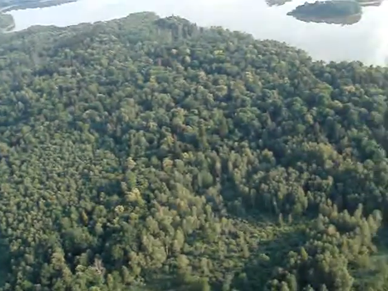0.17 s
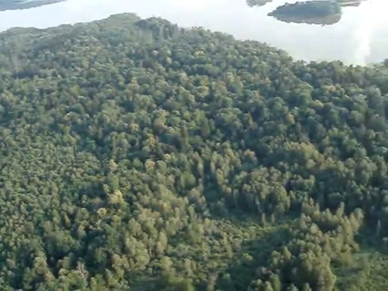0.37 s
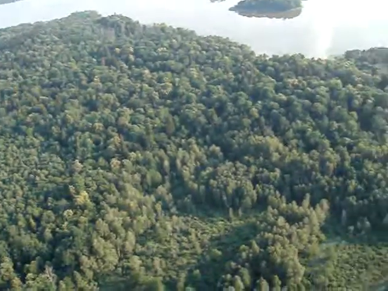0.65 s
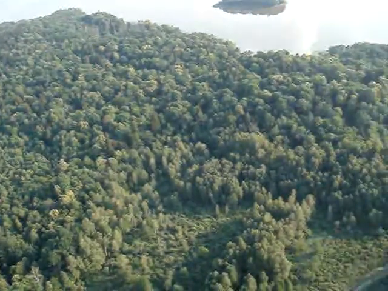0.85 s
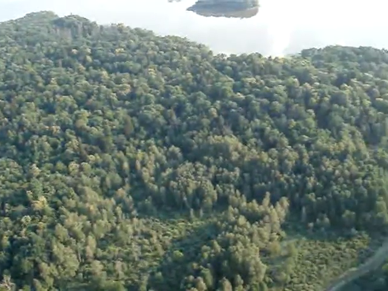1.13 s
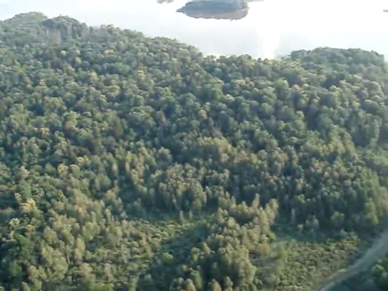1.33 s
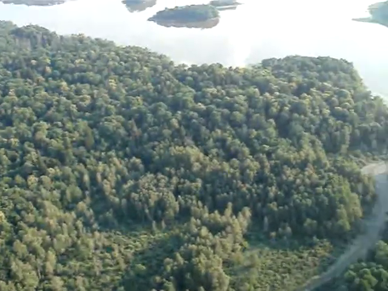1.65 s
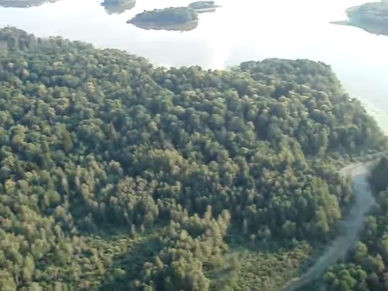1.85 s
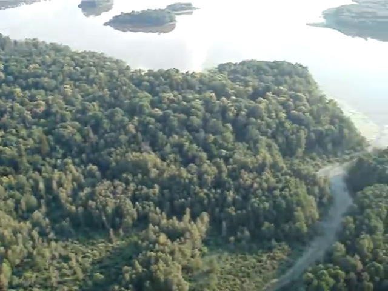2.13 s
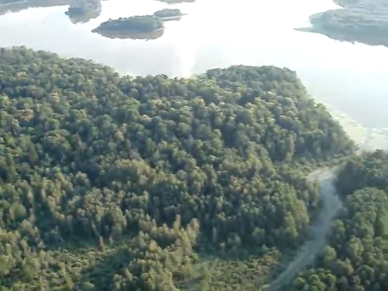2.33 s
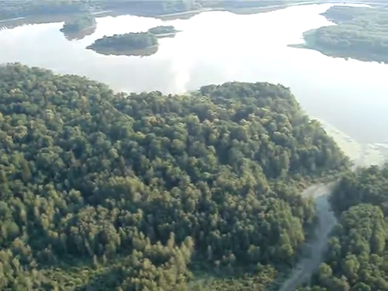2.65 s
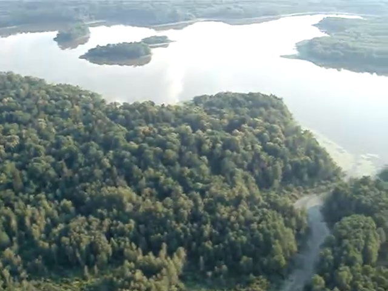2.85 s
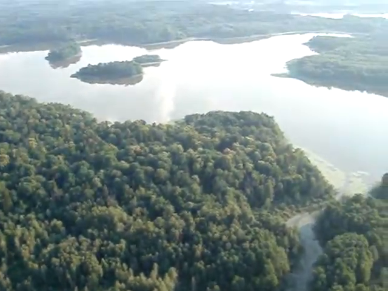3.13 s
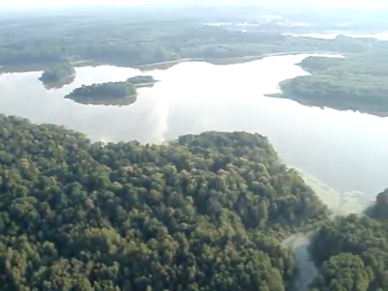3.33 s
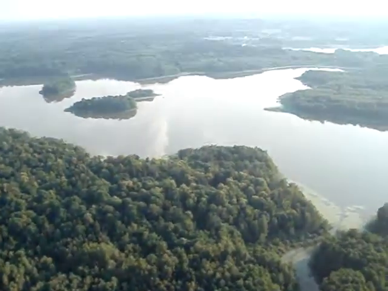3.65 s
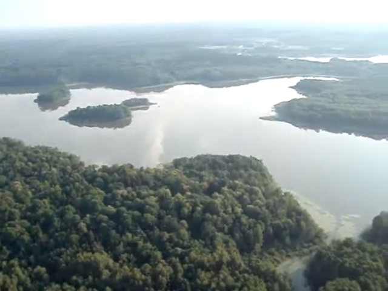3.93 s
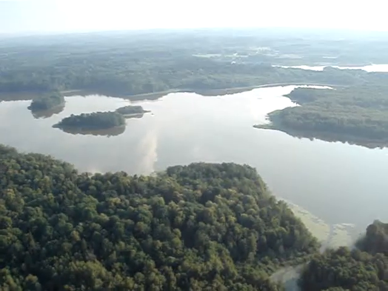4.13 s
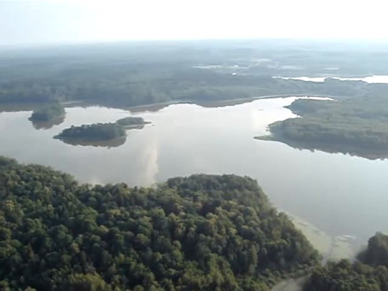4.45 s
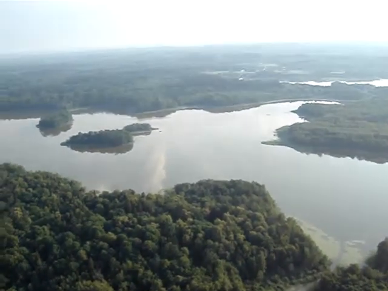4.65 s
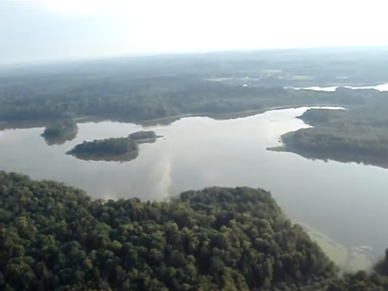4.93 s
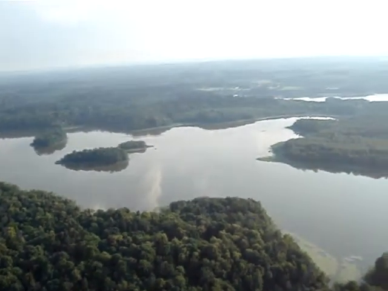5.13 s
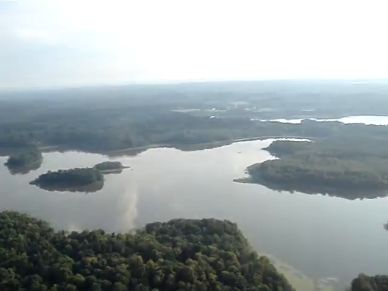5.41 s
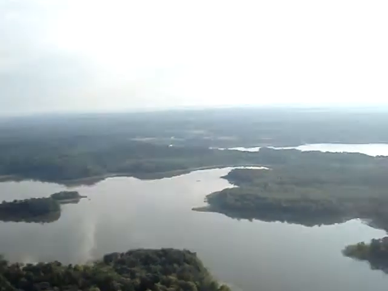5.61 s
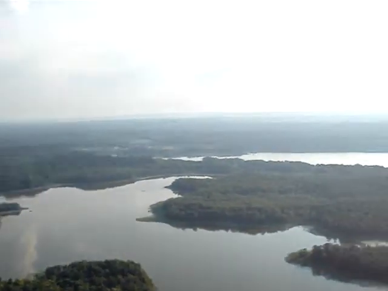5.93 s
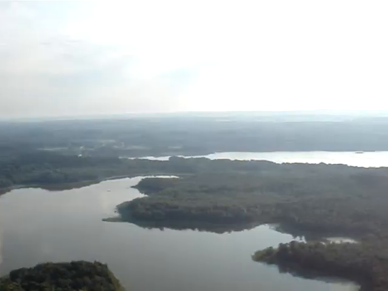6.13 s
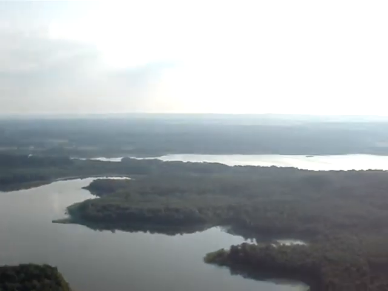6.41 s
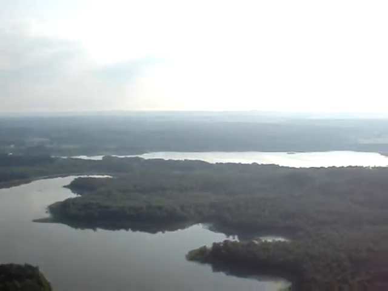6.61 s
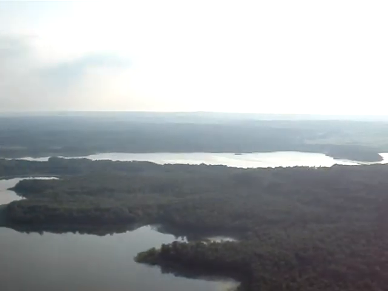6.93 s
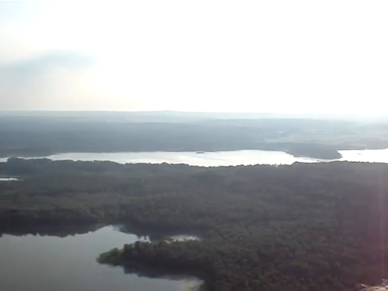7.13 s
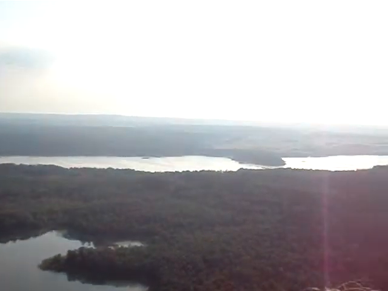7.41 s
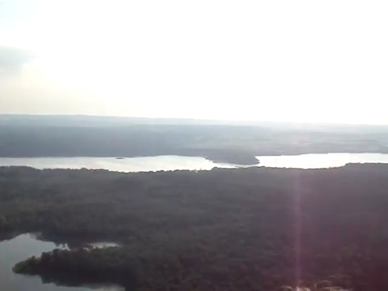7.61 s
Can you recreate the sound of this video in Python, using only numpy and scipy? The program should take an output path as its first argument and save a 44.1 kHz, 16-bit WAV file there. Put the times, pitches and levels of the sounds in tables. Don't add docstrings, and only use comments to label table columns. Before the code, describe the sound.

A sputtering pilot flame spits and faintly whistles for a second, then a propane balloon burner ignites with a whoomp and roars on loudly.

```python
import sys
import numpy as np
from scipy import signal
from scipy.fft import rfft, irfft
from scipy.io import wavfile
from scipy.ndimage import uniform_filter1d, map_coordinates

SR = 44100
rng = np.random.default_rng(int(sys.argv[2]) if len(sys.argv) > 2 else 0)


def volts(x):
    e = np.asarray(x, float) / 20
    return 10 ** e


def materialize(psi):
    bounded = np.clip(np.atleast_2d(psi).T, -1, 1)
    quanta = np.round(bounded * 32767).astype(np.int16)
    wavfile.write(sys.argv[1], SR, quanta)


N = 342216

# time_s, turn (0-3, picks between the colours below)
CAMERA_TURN = [(0, 0.5), (1.8, 0.029), (2.6, 0.28), (3.5, 0.93), (4.2, 1.23), (4.9, 1.23), (5.3, 1.72),
               (5.9, 2.24), (6.4, 2.44), (6.8, 2.6), (7.76, 3.3)]
# freq_hz, density_db (per Hz)
FLAME_COLOURS = [
    [(110, -40), (180, -12), (267, -5), (322, -6.5), (375, -2), (426, -7), (537, 0.5), (760, -6),
     (855, -21.5), (950, -15.5), (1100, -12), (1500, -20.5), (2000, -14), (2580, -32), (3770, -51)],
    [(110, -39), (180, -13.5), (255, -6), (304, -10), (349, 1.5), (402, -9), (441, -3), (519, 1), (662, -8),
     (875, -14.5), (1090, -14), (1380, -20), (1820, -13), (2900, -29.5), (3770, -52.5), (6380, -120)],
    [(110, -35), (180, -13), (249, -6), (287, -12.5), (349, -1), (388, -11), (436, 0), (596, -10),
     (770, -6), (972, -16), (1100, -15), (1860, -11.5), (2120, -16.5), (2900, -30.5), (3770, -58),
     (6380, -120)],
    [(110, -37), (180, -11), (225, -9.5), (345, -5), (379, -6), (451, -1.5), (600, -7), (715, -1.5),
     (800, -8), (900, -12.5), (1680, -14.5), (1910, -10.5), (2120, -21), (2900, -36), (3770, -50)],
]
# freq_hz, density_db (per Hz)
JET_COLOURS = [
    [(1410, -30), (2400, -5), (2610, -14.5), (3360, -4), (4740, -6), (5120, -2.5), (6300, -0.5), (7700, -4),
     (8410, -11), (9870, -17), (12800, -48), (21700, -120)],
    [(1410, -32), (2400, -13), (3040, -13), (4140, -5), (4770, -8.5), (6150, -2.5), (7090, -5),
     (7700, -6.5), (8510, -15), (9870, -18.5), (12800, -50.5), (21700, -120)],
    [(1410, -31.5), (2400, -8), (2700, -13), (3380, -6), (4440, -4), (5800, -1.5), (6300, 0.5),
     (7650, -1.5), (8460, -12.5), (9870, -16.5), (12800, -56), (21700, -120)],
    [(1410, -31), (2400, 1), (3250, -2), (3880, -3.5), (4240, -1), (5630, -3.5), (6560, -0.5), (7560, -3),
     (8360, -9.5), (9870, -15.5), (12800, -54), (21700, -120)],
]
JET_SHADE_DB = [-0.5, 0.63, -0.06, -2.5]
# freq_hz, density_db (per Hz)
RUMBLE_COLOUR = [(13, -65), (22, -26), (92, -12.5), (146, 0), (189, -6.5), (260, -1), (340, -27),
                 (570, -120)]
# peak_s, rise_s, surge_db (over steady), surge_fade_s, steady_db
FLAME_CATCH = (.939, .027, 2.5, .013, -16.2)
JET_CATCH = (.972, .066, 7, .066, -23.2)
RUMBLE_CATCH = (.94, .03, 7, .025, -30)
# freq_hz, density_db (per Hz)
COIL_COLOUR = [(1700, -42), (1830, -5), (1900, 8), (1980, -8), (2120, -43)]
NOZZLE_COLOUR = [(5800, -39), (6050, -5), (6170, 8), (6290, -11), (6550, -43)]
# centre_s, half_length_s, peak_db
COIL_SWELLS = [
    (2.95, 0.37, -36),
    (3.7, 0.34, -34),
    (5.3, 0.29, -31.5),
    (6.8, 0.68, -32.5),
]
NOZZLE_SWELLS = [
    (2.6, 0.62, -43),
    (3.7, 0.3, -29.5),
    (5.5, .4, -41.5),
]
WHISTLE_SWELLS = [
    (.09, .04, -49),
    (.26, .06, -55),
    (.54, 0.065, -50.5),
    (.72, .04, -52),
    (.9, .05, -51),
]
# start_s, peak_db, low_share_db
SPITS = [(0.0136, -14, 1), (0.074, -19, -3.5), (0.188, -16, -3), (0.195, -13.5, -6), (0.329, -15.5, -4),
         (0.367, -19.5, -4), (0.4519, -32, -4), (0.4988, -12.5, -1), (0.5194, -20, 4), (0.5935, -32, 1.5),
         (0.6464, -21.5, 4), (0.667, -15.5, -7), (0.7148, -20.5, -6), (0.7637, -30, -4), (0.837, -13, 7.5),
         (2.4194, -14, 6)]
# freq_hz, density_db (per Hz)
SPIT_COLOUR = [(530, -59), (900, -27), (3000, -17), (3500, -12.5), (4340, -8.5), (4900, -18), (5500, -4.5),
               (7200, -8), (8000, -8), (8500, -19), (10000, -30), (12000, -60)]
PILOT_COLOUR = [(15, -43), (25, -12), (150, 1), (600, -2.5), (880, -13), (1200, -5.5), (1450, -13),
                (1900, -4.5), (3200, -14), (4000, -6.5), (5400, -6.5), (7600, -17), (8500, -24.5),
                (10000, -32), (12000, -61.5)]
# start_s, peak_db, pitch_hz
BUMPS = [(0.024, -32, 156), (0.061, -25, 180), (0.124, -26.5, 218), (0.179, -31, 288), (0.251, -25, 536),
         (0.319, -37, 266), (0.395, -27, 525), (0.461, -33, 161), (0.609, -32, 156), (0.837, -24, 146)]

COIL_REST_DB, NOZZLE_REST_DB, WHISTLE_REST_DB = -50, -53, -61
PILOT_DB, WHISTLE_HZ = -39.5, 1240
SPIT_RISE_S, SPIT_T60_S = 0.003, 0.13
BOOM_S, BOOM_HZ, BOOM_HALF_S, BOOM_DB = 0.943, 143, 0.016, -6
CATCH_RISE_DB = 30
SETTLE_DB, SETTLE_S = 3.5, 0.27
TOP_HZ = 10280


def unit(x):
    return x / np.sqrt(np.mean(x ** 2) + 1e-20)


def wobble(rate):
    knots = rng.standard_normal(int(N * rate / SR) + 4)
    return map_coordinates(knots, [np.arange(N) * rate / SR])


def rush(colours, patchy_db):
    hz, t, z = signal.stft(rng.standard_normal(N + 2048), SR, nperseg=2048)
    shapes_db = []
    for colour in colours:
        knot_hz, knot_db = np.transpose(colour)
        shapes_db.append(np.interp(np.log(hz + 1), np.log(knot_hz + 1), knot_db))
    shapes_db = np.array(shapes_db)
    shapes_db -= 10 * np.log10(np.mean(volts(2 * shapes_db), axis=1, keepdims=True))
    turn = np.clip(np.interp(t, *np.transpose(CAMERA_TURN)), 0, len(colours) - 1)
    share = np.clip(1 - np.abs(turn - np.arange(len(colours))[:, None]), 0, 1)
    patches = uniform_filter1d(rng.standard_normal(z.shape), size=20, axis=0)
    patches = uniform_filter1d(patches, size=3, axis=1)
    gain = volts(shapes_db.T @ share + patchy_db * unit(patches))
    return unit(signal.istft(z * gain, SR, nperseg=2048)[1][:N])


def catch(peak_s, rise_s, surge_db, fade_s, steady_db):
    age = np.arange(N) / SR - peak_s
    before, after = np.clip(-age, 0, None), np.clip(age, 0, None)
    surge = surge_db * np.exp(-(after / fade_s) ** 2)
    settling = SETTLE_DB * np.exp(-after / SETTLE_S)
    return np.maximum(steady_db + surge + settling - CATCH_RISE_DB * (before / rise_s) ** 2, -120)


def swells(rows, rest_db):
    t = np.arange(N) / SR
    return volts(rest_db) + sum(volts(db) * np.exp(-((t - s) / half) ** 2) for s, half, db in rows)


def blast():
    turn = np.interp(np.arange(N) / SR, *np.transpose(CAMERA_TURN))
    shade_db = np.interp(turn, np.arange(len(JET_SHADE_DB)), JET_SHADE_DB)
    flicker, swell = wobble(14), wobble(3.96)
    flame_db = catch(*FLAME_CATCH) + 0.37 * swell + 0.66 * flicker + 0.3 * wobble(60)
    jets_db = catch(*JET_CATCH) + shade_db + 0.3 * swell + 0.42 * flicker + 0.47 * wobble(120)
    rumble_db = catch(*RUMBLE_CATCH) + 1.3 * wobble(7) + 0.41 * flicker
    flame = volts(flame_db) * rush(FLAME_COLOURS, patchy_db=0.2)
    jets = volts(jets_db) * rush(JET_COLOURS, patchy_db=0.2)
    rumble = volts(rumble_db) * rush([RUMBLE_COLOUR], patchy_db=-0.7)
    return flame + jets + rumble


def boom():
    age = np.arange(N) / SR - BOOM_S
    return volts(BOOM_DB) * np.exp(-(age / BOOM_HALF_S) ** 2) * np.cos(2 * np.pi * BOOM_HZ * age)


def singing():
    lit = np.arange(N) / SR > FLAME_CATCH[0]
    coil = swells(COIL_SWELLS, COIL_REST_DB) * rush([COIL_COLOUR], patchy_db=-3.5)
    nozzles = swells(NOZZLE_SWELLS, NOZZLE_REST_DB) * rush([NOZZLE_COLOUR], patchy_db=0.5)
    return lit * (coil + nozzles)


def spits():
    t = np.arange(N) / SR
    high_power, low_power = np.zeros(N), np.zeros(N)
    for s, db, low_db in SPITS:
        age = np.clip(t - s, 0, None)
        spent = np.hypot(age, 0.012) - 0.012
        puff = volts(db - 9.5 - 60 * spent / SPIT_T60_S) * (1 - np.exp(-age / SPIT_RISE_S))
        high_power += puff ** 2
        low_power += (volts(low_db - 13) * puff) ** 2
    hiss = np.sqrt(high_power) * volts(1.9 * wobble(250)) * rush([SPIT_COLOUR], patchy_db=2.1)
    low_colour = FLAME_COLOURS[0] + JET_COLOURS[0][2:]
    return hiss + np.sqrt(low_power) * rush([low_colour], patchy_db=1.5)


def bumps():
    out, t = np.zeros(N + SR), np.arange(SR // 10) / SR
    for s, db, hz in BUMPS:
        cycles = t * hz
        push = cycles * np.exp(-cycles / 0.5) * np.sin(2 * np.pi * cycles)
        out[round(s * SR):][:len(t)] += volts(db + 12.5) * push
    return out[:N]


def pilot():
    steady = volts(PILOT_DB + 0.92 * wobble(30)) * rush([PILOT_COLOUR], patchy_db=1.5)
    phase = 2 * np.pi * np.cumsum(WHISTLE_HZ + 2.5 * wobble(13)) / SR
    whistle = volts(4) * swells(WHISTLE_SWELLS, WHISTLE_REST_DB) * np.sin(phase)
    return steady + whistle


def scene():
    return np.tile(blast() + boom() + singing() + spits() + bumps() + pilot(), (2, 1))


def starved(x, spare_db, luck_db):
    hz, t, z = signal.stft(x, SR, nperseg=256)
    bands = np.arange(len(hz)) // 4
    band_hz = hz[::4, None]
    power = np.add.reduceat(np.abs(z) ** 2, np.arange(0, len(hz), 4))
    nearby = uniform_filter1d(power, size=20, axis=1, origin=4)
    luck = uniform_filter1d(rng.standard_normal(power.shape), size=5, axis=1)
    margin_db = spare_db - 0.5 * band_hz / 1000 + luck_db * unit(luck)
    keep = (power > nearby * volts(-2 * margin_db)) | (band_hz < 4800)
    return signal.istft(z * keep[bands], SR, nperseg=256)[1][:N]


def low_pass(x):
    return signal.sosfilt(signal.butter(12, 15800, fs=SR, output="sos"), x)


def record(dry):
    squeezed = dry[0] / (1 + np.abs(dry[0] / 0.69) ** 6) ** (1 / 6)
    thin = starved(squeezed, spare_db=11, luck_db=3.6)
    hz = np.fft.rfftfreq(N + SR, 1 / SR)
    band_limit = np.clip((TOP_HZ - hz) / 250, 0, 1)
    narrow = irfft(rfft(thin, N + SR) * band_limit, N + SR)[:N]
    clipped = np.tile(np.clip(narrow, -0.705, 0.705), (2, 1))
    return low_pass(clipped)


dry = scene()
out = record(dry)
materialize(out)
```